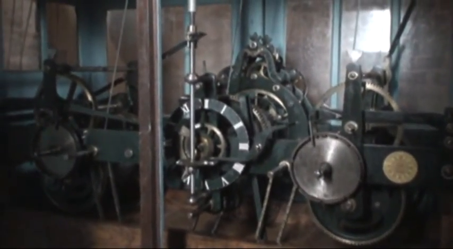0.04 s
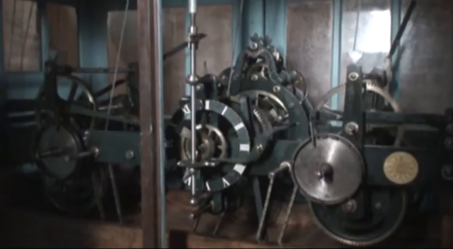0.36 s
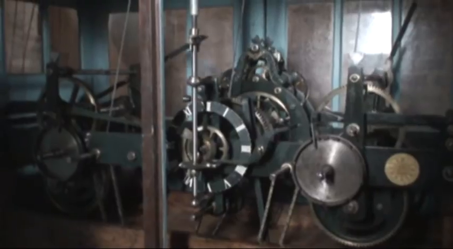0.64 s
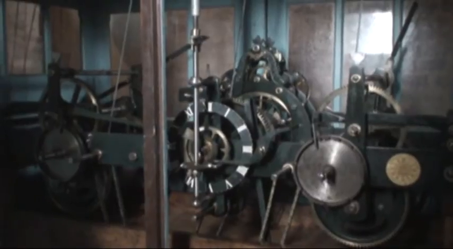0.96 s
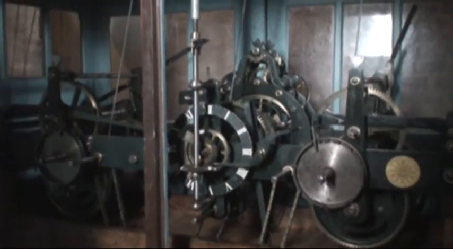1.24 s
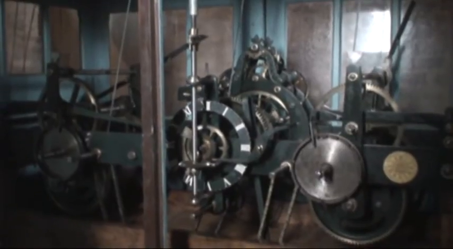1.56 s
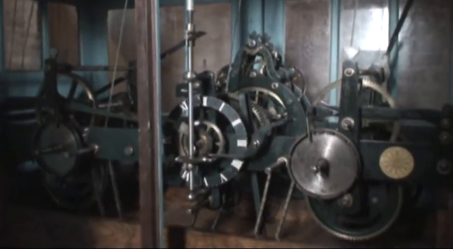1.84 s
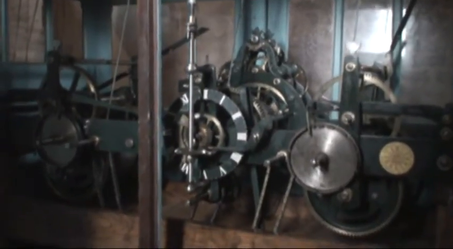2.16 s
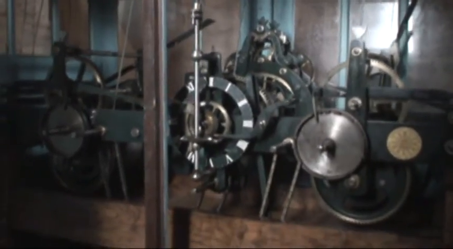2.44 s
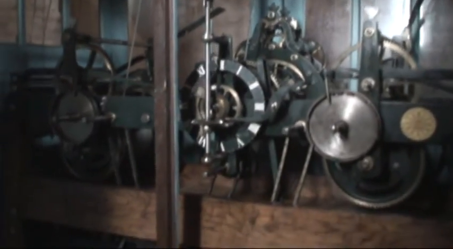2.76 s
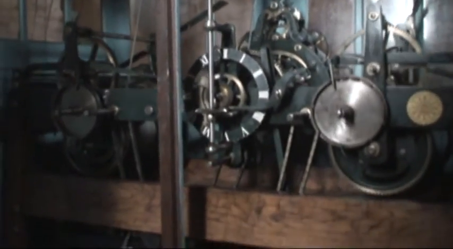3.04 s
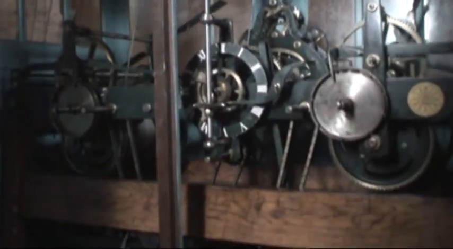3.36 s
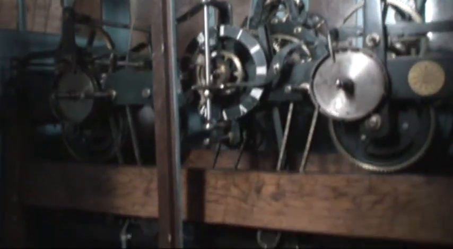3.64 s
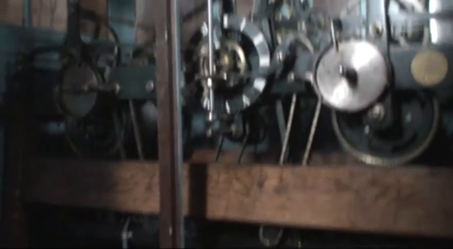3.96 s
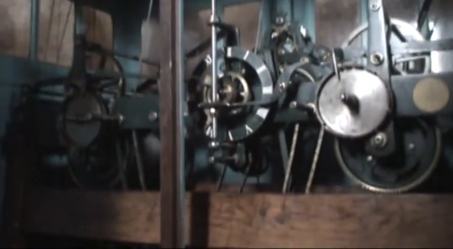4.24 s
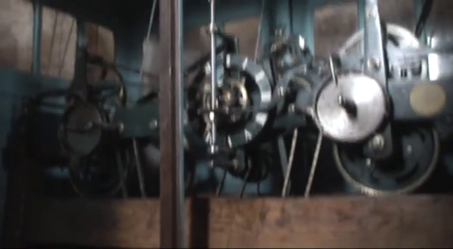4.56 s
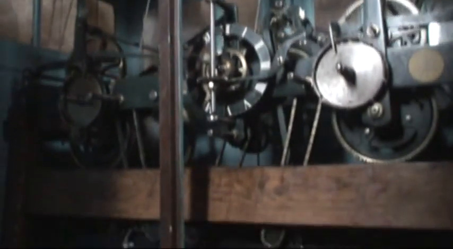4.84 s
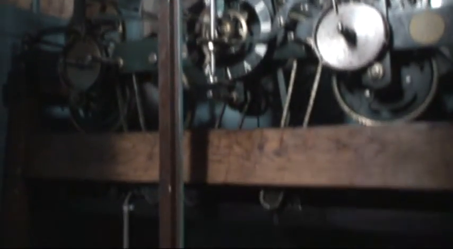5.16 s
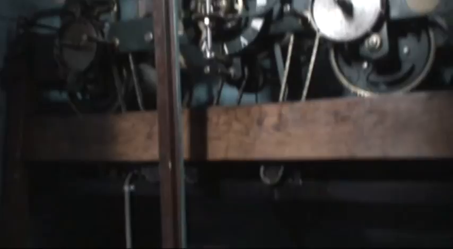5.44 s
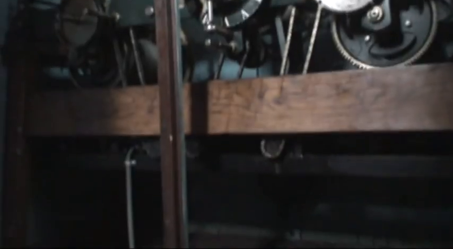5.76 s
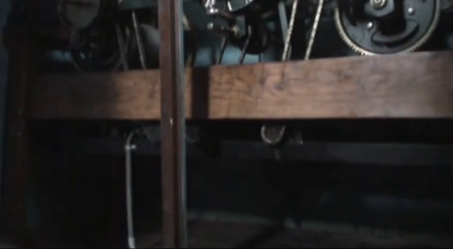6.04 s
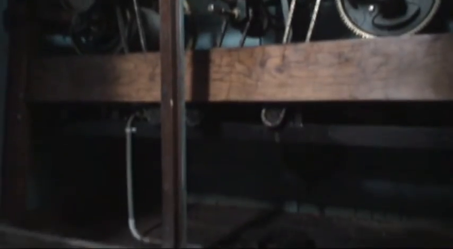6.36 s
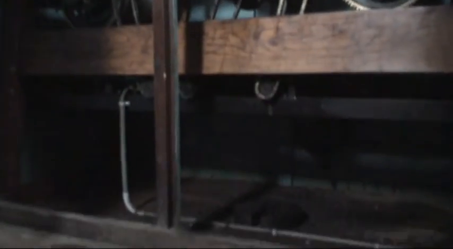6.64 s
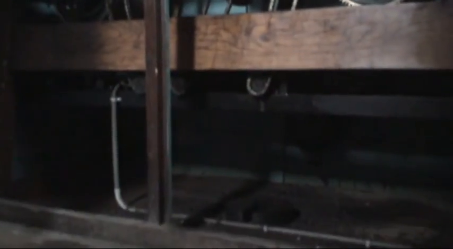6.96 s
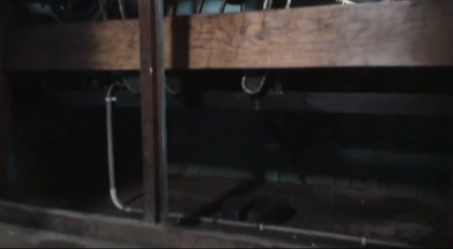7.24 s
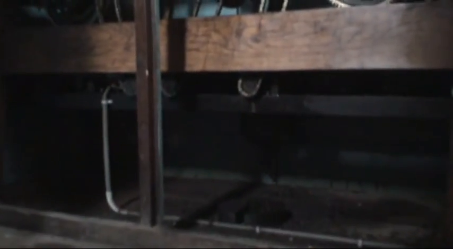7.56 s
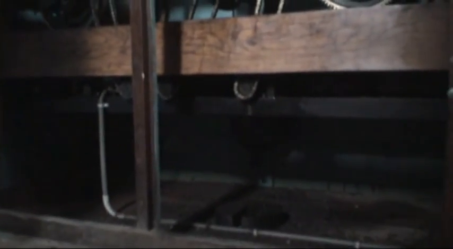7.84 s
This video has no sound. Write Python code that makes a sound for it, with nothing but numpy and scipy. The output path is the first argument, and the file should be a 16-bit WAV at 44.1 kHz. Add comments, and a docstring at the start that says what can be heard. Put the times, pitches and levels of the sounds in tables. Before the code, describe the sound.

Slow, even metallic clunks come from a big mechanical clock movement, one per second, each bouncing into a short rattle. Near the start a heavy metal lever crashes down once, ringing briefly and shaking its wooden bed, far louder than the ticks. Small wooden knocks follow, then soft clothing rustle and clicks on the hand-held microphone. The clock keeps beating to the end in a small tower room with a faint hum.

```python
"""A small wooden room, a hand-held camera's two-port microphone, a tower clock beating once a second.
From the first beat the escapement lands on a pallet and rebounds, shaking the iron frame; on every
other beat it clicks as it unlocks. Just before 1 s a heavy lever drops with a clack and thumps the
timber bed. From 2 s come small knocks. Around 4 s cloth rustles up near the microphone, with a creak
and handling clicks, and the clock beats on to the end over still air and a low hum."""
import sys
import numpy as np
from scipy import signal
from scipy.fft import rfft, irfft, next_fast_len
from scipy.io import wavfile

SR = 44100
rng = np.random.default_rng(int(sys.argv[2]) if len(sys.argv) > 2 else 0)


def put_to_file(sound):
    """Save the sound as 16-bit audio at rate SR, in the file named by the first command-line argument."""
    columns = np.atleast_2d(sound).T  # one column per channel
    safe = np.clip(columns, -1, 1)
    whole_steps = np.round(safe * 32767)
    wavfile.write(sys.argv[1], SR, whole_steps.astype(np.int16))


N = 352359

# beats, the two pallets in turn: t/s, frame thud/dB, steel ring/dB, first rebound's ring/dB,
# time to that rebound/s, number of rebounds, extra boom/dB, extra clack/dB, extra sparkle/dB
BEATS = [(.470, -31, -37.5, -40.5, 0.046, 2, 1, 0, 2.5), (1.475, -31.5, -38, -42, 0.076, 5, 1.5, -1.5, 2.5),
         (2.472, -34.5, -43.5, -43.5, 0.048, 3, 5, 2.5, 7), (3.478, -33.5, -38, -42.5, 0.059, 5, 3.5, 2, 4),
         (4.472, -30.5, -42, -41.5, 0.054, 3, -4, 2.5, 4),
         (5.478, -30.5, -36.5, -41.5, 0.0646, 5, 2, 0.5, 4.5),
         (6.474, -31.5, -38, -40.5, 0.051, 3, 1, 2, 6.5), (7.481, -34, -41.5, -40, 0.08, 4, 1.5, -1.5, 9)]
# the three bands that differ from tooth to tooth: from f/Hz, to f/Hz
BOOM_HZ, CLACK_HZ, SPARKLE_HZ = (228, 377), (720, 1250), (11470, 17000)
# each pallet's chatter: gap from first to second rebound/s, ratio of each gap to the last, ring loss
# per rebound/dB, thud drop on rebound/dB, further thud loss/(dB/s), train's ring against landing's/dB
CHATTER = [(0.042, 1.3, 3, 4, 119, -9), (0.037, 0.97, 0.96, 3, 153, -1.5)]
# the first pallet unlocks shortly before it lands: t/s, level/dB
UNLOCKS = [(.430, -55.5), (2.431, -50.5), (4.434, -54), (6.431, -49)]
# spectra of the iron frame and the steel escapement: f/Hz, level/dB
IRON_SPECTRUM = [(55, -35), (145, -10), (240, 3), (620, 6.5), (960, -0.5), (1320, -6.5), (1750, -9.5),
                 (3100, -12), (8200, -32)]
STEEL_SPECTRUM = [(320, -13), (1150, -18), (2050, -0.5), (2650, -5.5), (4100, -1.5), (5900, -1),
                  (7500, -4.5), (8500, -7.5), (11200, -13), (12600, -21.5), (15900, -32.5)]
# their modes: f/Hz, width/Hz, peak from the first pallet/dB, peak from the second/dB
IRON_MODES = [(195, 14, 8, 9), (266, 20, 6, 12), (304, 18, 7, 6), (356, 20, 3, 9), (459, 20, 0, 2),
              (557, 30, 7, 6), (584, 24, 9, 8), (781, 36, 6, 7), (851, 20, 4, -3), (924, 25, 2, -5),
              (1016, 30, 4, 5), (1196, 35, 2, 5), (1291, 70, 6, -1)]
STEEL_MODES = [(1745, 70, 3, 3), (2058, 35, 5, -2), (2226, 45, 2, 9), (2832, 50, 7, 6), (3026, 30, 9, 0),
               (3521, 35, -1, 5), (3902, 60, -5, 6), (4336, 35, 7, -3), (4428, 50, -9, 6), (4691, 30, 7, 1),
               (4872, 60, -3, 6), (5702, 70, -1, 3), (5965, 110, 5, 5), (6152, 40, 3, 7),
               (6386, 20, 14, 10), (6901, 22, 14, 10), (7588, 45, 10, 14), (7702, 45, 9, 7),
               (9941, 35, 0, 10), (13282, 35, 22, 22), (15728, 40, 10, 10)]

# the lever is nudged up, slips, crashes down, bounces: t/s, timber thump/dB, clunk/dB, steel crash/dB
LEVER_BLOWS = [(0.674, -50.5, -53.5, -63), (0.749, -56, -50, -59), (.862, -53, -41.5, -60),
               (0.8802, -61, -19, -14), (.922, -35, -26, -24), (0.985, -29, -31.5, -39.5),
               (1.085, -64, -81, -73)]
# spectra of the timber bed, the lever's body and its steel: f/Hz, level/dB
THUMP_SPECTRUM = [(25, -16.5), (48, -11), (70, -7), (110, 5), (165, 3.5), (230, -29), (500, -70)]
CLUNK_SPECTRUM = [(100, -3), (270, 2.5), (400, -2), (550, -1.5), (740, 2), (900, -10.5), (1500, -9),
                  (2500, -17), (6000, -38)]
CRASH_SPECTRUM = [(320, -13.5), (1250, 3), (2450, 2), (4900, 4.5), (7100, 2), (8900, 0.5), (10900, 3),
                  (12400, -9), (14100, -11), (15900, -20.5)]
# the lever's modes: f/Hz, width/Hz, peak/dB
LEVER_MODES = [(287, 15, 7), (355, 18, 11), (479, 15, 6), (826, 17, 6), (1101, 18, 5), (1261, 18, 5),
               (1351, 22, 8), (1446, 16, 9), (1948, 16, 4), (2178, 40, 6), (2571, 28, 5), (2701, 19, 5),
               (2809, 21, 9), (3043, 14, 8), (3378, 36, 10), (3463, 22, 10), (3766, 24, 6), (4108, 50, 7),
               (4591, 33, 5), (5665, 80, 10), (7102, 24, 9), (7559, 26, 13), (7706, 36, 6), (8471, 85, 5),
               (11485, 24, 10)]
# the lever rings on as it rebounds: f/Hz, level/dB, t60/s
LEVER_PING = [(1954, -26.5, 0.33), (2513, -26, 0.24), (3040, -25.5, 0.47), (3270, -34, 0.3),
              (5636, -28, 0.25), (7000, -58, 0.16)]

# dull wooden knocks around the room: t/s, level/dB, centre f/Hz
KNOCKS = [(2.057, -37.5, 706), (2.091, -46, 744), (2.262, -43.5, 857), (3.162, -45.5, 855),
          (4.732, -46, 1050), (4.808, -42, 700), (6.143, -44.5, 820)]
# sharp handling clicks: t/s, level/dB, centre f/Hz, t60/s
CLICKS = [(4.170, -43.5, 1970, 0.041), (4.283, -41.5, 1550, 0.033), (5.108, -45.5, 2660, 0.21),
          (6.005, -33, 4360, 0.0055)]
# a short hollow creak: t/s, length/s, level/dB, f/Hz
CREAK = (3.979, .036, -43, 377)
# spectra of the room's air and of cloth near the microphone: f/Hz, level/dB
AIR_SPECTRUM = [(20, -3), (48, 9), (75, 6.5), (115, 8), (150, -4), (250, 2.5), (550, -1.5), (880, 2.5),
                (1300, -5.5), (2000, -7.5), (4000, -14.5), (8000, -20.5), (15000, -22)]
CLOTH_SPECTRUM = [(100, -3.5), (350, 2.5), (900, -1.5), (1600, -3.5), (3000, -6.5), (7000, -11),
                  (10000, -18), (16000, -25.5)]
# rise and fall of the rustle and the hum: t/s, level/dB
CLOTH_LEVEL = [(0, -76.5), (1.9, -63), (2.9, -61.5), (3.3, -59.5), (3.75, -54), (4.4, -52), (4.8, -57.5),
               (6.0, -58.5), (7.3, -66.5), (8, -67.5)]
HUM_LEVEL = [(0, -62.5), (2.5, -66), (3.5, -60.5), (5.1, -57), (8, -59)]
# clock and room tone at the two microphone ports, three curves each:
# (f/Hz, likeness), (f/Hz, left minus right/dB), (f/Hz, left's lead/rad)
CLOCK_PORTS = [(60, 0.95), (180, 1), (550, 0.67), (1650, 0.75), (4970, 0.85), (15000, 0.57)], [(60, -1),
               (150, 2), (380, 1), (950, 3), (2380, 2), (5980, 0.8), (15000, -0.8)], [(0, 0), (600, 0.25),
               (2410, 0.055), (8700, 0.064), (16200, 0.0)]
ROOM_PORTS = [(60, 1), (240, 0.58), (950, 0.098), (3770, 0.047), (15000, 0.6)], [(60, 0.514), (380, 0.41),
              (2380, 0.85), (15000, 0.078)], [(0, 0), (15400, -0.07), (16200, 0.3)]


def escapement(pallet):
    """Blows on one pallet, every other second, ring the steel and swell more slowly in the iron frame."""
    beats = BEATS[pallet::2]
    on_frame, on_steel, out = [], [], np.zeros((2, N))
    for beat in beats:
        thuds, landing, rebounds = chatter(beat, *CHATTER[pallet])
        on_frame += thuds
        on_steel += landing + rebounds
        if pallet == 0:
            for s, _ in rebounds[2:]:
                add(out[:1], s, settling())
    if pallet == 0:
        on_steel += UNLOCKS
    thuds = blows(*np.transpose(on_frame), rise=0.0058, early_t60=0.09, tail_db=-9.5, tail_t60=0.42)
    rings = blows(*np.transpose(on_steel), rise=0.0045, early_t60=0.22, tail_db=-15.5, tail_t60=0.3)
    iron_modes = [(hz, width, db[pallet]) for hz, width, *db in IRON_MODES]
    steel_modes = [(hz, width, db[pallet]) for hz, width, *db in STEEL_MODES]
    boom, clack, sparkle = (per_beat(beats, column) for column in (-3, -2, -1))
    frame = body(thuds, IRON_SPECTRUM, iron_modes)
    frame = boost(frame, BOOM_HZ, boom)
    frame = boost(frame, CLACK_HZ, clack)
    steel = body(rings, STEEL_SPECTRUM, steel_modes, crowd_db=3.8)
    return out + frame + boost(steel, SPARKLE_HZ, sparkle)


def chatter(beat, gap, gap_ratio, ring_loss_db, thud_drop_db, thud_db_per_s, train_ring_db):
    """A pallet lands, the wheel train stops, the pallet rebounds ever more weakly: lists of t/s, dB."""
    s, thud_db, ring_db, rebound_db, flight, count, *_ = beat
    train_lag_s = 0.014
    bounce = np.arange(round(count))
    gaps = gap * gap_ratio ** bounce
    later = np.cumsum(gaps) - gaps
    times = s + flight + later
    nudge_db = thud_db - thud_drop_db - thud_db_per_s * later
    # on landing the contact is softer than the train's stop; on a rebound the train is the weaker
    thuds = [(s, thud_db - 3.5), (s + train_lag_s, thud_db)]
    thuds += [*zip(times, nudge_db - 1.5), *zip(times + train_lag_s, nudge_db - 2.5)]
    landing = [(s, ring_db), (s + train_lag_s, ring_db + train_ring_db)]
    rebounds = list(zip(times, rebound_db - ring_loss_db * bounce))
    return thuds, landing, rebounds


def settling():
    """One steel mode rings on after the first pallet's third rebound."""
    return ringing(hz=4691, db=-51.5, t60=0.27, rise=0.0037, length_s=0.5)


def lever(weight_lag_s=0.013, ping_s=0.94):
    """A heavy lever crashes onto its stop, bounces, and shakes the timber bed."""
    s, thump_db, clunk_db, crash_db = np.transpose(LEVER_BLOWS)
    thumps = blows(s, thump_db, rise=0.0089, early_t60=0.12, tail_db=-13, tail_t60=0.76)
    # its weight follows each contact and clunks harder than the contact does
    clunks = blows(np.r_[s, s + weight_lag_s], np.r_[clunk_db - 4.5, clunk_db],
                   rise=0.0024, early_t60=0.44, tail_db=-13, tail_t60=0.48)
    crashes = blows(s, crash_db, rise=0.00083, early_t60=0.29, tail_db=-12, tail_t60=0.097)
    # the treble is brightest at the strike and dies sooner than the rest
    strike = s[np.argmax(crash_db)]
    glare_db, loss_db_per_s, fade_s = 1.5, 44.5, 0.25
    glare = [(strike, glare_db), (strike + fade_s, glare_db - loss_db_per_s * fade_s)]
    out = body(thumps, THUMP_SPECTRUM) + body(clunks, CLUNK_SPECTRUM, LEVER_MODES)
    out += boost(body(crashes, CRASH_SPECTRUM, LEVER_MODES), band_hz=(8500, 17000), curve=glare)
    for hz, db, t60 in LEVER_PING:
        add(out[:1], ping_s, ringing(hz, db, t60, rise=0.033, length_s=1))
    return out


def knocks():
    """Dull knocks around the room, sharp handling clicks and one short creak."""
    out = np.zeros((2, N))
    for s, db, hz in KNOCKS:
        add(out, s, tap(db, hz, width=0.4 * hz, t60=0.053))
    for s, db, hz, t60 in CLICKS:
        add(out, s, tap(db, hz, width=1.2 * hz, t60=t60))
    s, length, db, hz = CREAK
    t = np.arange(round(length * SR)) / SR
    creak = signal.windows.tukey(len(t), 0.5) * np.sin(2 * np.pi * hz * t)
    add(out[:1], s, amp(db) * unit_rms(creak))
    return out


def room_tone(air_db=-58.5, hum_hz=100.4, fibres_per_s=9000, snaps_per_s=6.8, snaps_db=-20):
    """Still air, a wavering hum, and grainy cloth near the microphone; now and then a fold snaps."""
    t, knots = np.arange(N) / SR, np.linspace(0, N / SR, num=120)
    swell, waver, folds = (np.interp(t, knots, row) for row in rng.standard_normal((3, len(knots))))
    air = amp(air_db) * body(rng.standard_normal((2, N)), AIR_SPECTRUM)
    hum = amp(0.74 * swell) * np.sin(2 * np.pi * hum_hz * t + 0.3 * waver)
    air[0] += level(HUM_LEVEL) * unit_rms(hum)
    fibres = rng.standard_normal((2, N)) * (rng.random(N) < fibres_per_s / SR) * amp(1.86 * folds)
    snaps = (rng.random((2, N)) - 0.5) * (rng.random(N) < snaps_per_s / SR)
    cloth = body(unit_rms(fibres) + amp(snaps_db) * unit_rms(snaps), CLOTH_SPECTRUM)
    return air + level(CLOTH_LEVEL) * cloth


def blows(times, levels_db, rise, early_t60, tail_db, tail_t60):
    """Each blow reaches the microphone as dense reflections, then a fainter room tail; powers add."""
    t, power = np.arange(SR) / SR, np.zeros((1, N))
    decay = np.hypot(amp(-60 * t / early_t60), amp(tail_db - 60 * t / tail_t60))
    shape = ((1 - np.exp(-t / rise)) * decay) ** 2
    for s, db in zip(times, levels_db):
        add(power, s, amp(db) ** 2 / shape.max() * shape)
    return np.sqrt(power) * rng.standard_normal((2, N))


def body(x, spectrum, modes=(), crowd_db=0, size=16384):
    """A causal filter of unit power: smooth spectrum, ringing modes, ripple from many weaker modes."""
    hz = abs(np.fft.fftfreq(size, 1 / SR))
    peaks = 1 + sum(amp(db) ** 2 / (1 + (2 * (hz - f) / width) ** 2) for f, width, db in modes)
    knots = np.arange(0, SR / 2, 40)
    ripple = np.interp(hz, knots, rng.standard_normal(len(knots)))
    gain = unit_rms(amp(read(spectrum, hz) + crowd_db * ripple) * np.sqrt(peaks))
    minimum_phase = np.exp(signal.hilbert(np.log(gain)).conj())
    response = np.fft.ifft(minimum_phase).real[:size // 2]
    return signal.oaconvolve(x, response[None], axes=1)[:, :N]


def ringing(hz, db, t60, rise, length_s):
    """One mode swells and dies away."""
    t = np.arange(round(length_s * SR)) / SR
    return amp(db - 60 * t / t60) * (1 - np.exp(-t / rise)) * np.sin(2 * np.pi * hz * t)


def tap(db, hz, width, t60, rise=0.00061):
    """A dead tap in one broad resonance."""
    t = np.arange(SR // 2) / SR
    top = np.hypot(hz, width / 2) + width / 2
    band = signal.butter(2, [top - width, min(top, SR / 2 - 1)], "band", fs=SR, output="sos")
    grain = unit_rms(signal.sosfilt(band, rng.standard_normal((2, len(t)))))
    return amp(db - 60 * t / t60) * (1 - np.exp(-t / rise)) * grain


def microphone(pair, likeness, balance, lead):
    """Two close ports pick up row 0 as mid and row 1 as side, giving left and right."""
    size = next_fast_len(N)
    hz, spectra = np.fft.rfftfreq(size, 1 / SR), rfft(pair, size)
    same = np.sqrt(np.clip(read(likeness, hz), 0, 1))
    mid = np.sqrt((1 + same) / 2) * spectra[0]
    side = np.sqrt((1 - same) / 2) * spectra[1]
    lean = amp(read(balance, hz) / 2) * np.exp(0.5j * read(lead, hz))
    return irfft(np.array([(mid + side) * lean, (mid - side) / lean]), size)[:, :N]


def boost(x, band_hz, curve):
    """Raises or lowers one band along a curve of t/s, level/dB."""
    band = signal.butter(2, np.minimum(band_hz, SR / 2 - 1), "band", fs=SR, output="sos")
    return x + (level(curve) - 1) * signal.sosfiltfilt(band, x)


def per_beat(beats, column):
    """A curve of t/s, level/dB that holds each beat's value for a second."""
    return [(beat[0] + held, beat[column]) for beat in beats for held in (0, 1)]


def amp(db):
    """Decibels to gain."""
    return 10 ** (np.asarray(db) / 20)


def unit_rms(x):
    """Scales to rms 1."""
    return x / np.sqrt(np.mean(x ** 2) + 1e-20)


def read(points, hz):
    """Reads a spectrum on a log-frequency axis."""
    f, value = np.transpose(points)
    return np.interp(np.log(hz + 1), np.log(f), value)


def level(curve):
    """A curve of t/s, level/dB as a gain for every sample."""
    return amp(np.interp(np.arange(N) / SR, *np.transpose(curve)))


def add(mix, s, sound):
    """Mixes a sound in at s seconds."""
    part = mix[:, round(s * SR):][:, :sound.shape[-1]]
    part += sound[..., :part.shape[-1]]


def scene():
    """The pallets take turns and the lever falls once; room tone arrives more diffuse than the clock."""
    clock = escapement(pallet=0) + escapement(pallet=1) + lever()
    return microphone(clock + knocks(), *CLOCK_PORTS) + microphone(room_tone(), *ROOM_PORTS)


def record(dry, bass_cut_hz=33, band_limit_hz=15900):
    """The camera's bass roll-off and band limit."""
    bass_cut = signal.butter(4, bass_cut_hz, "high", fs=SR, output="sos")
    band_limit = signal.firwin(511, band_limit_hz, window=("kaiser", 9), fs=SR)
    return signal.oaconvolve(signal.sosfilt(bass_cut, dry), band_limit[None], "same")


dry = scene()
out = record(dry)
put_to_file(out)
```